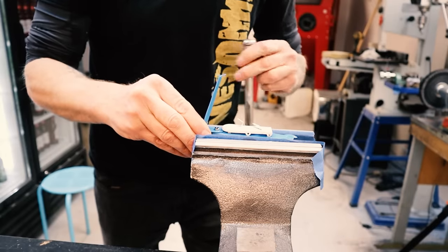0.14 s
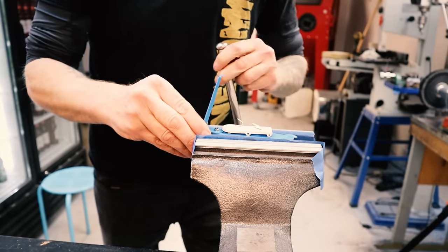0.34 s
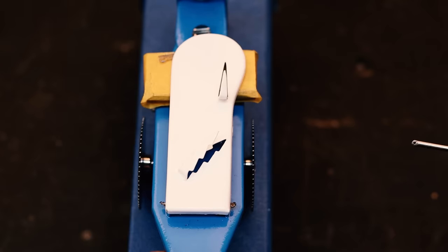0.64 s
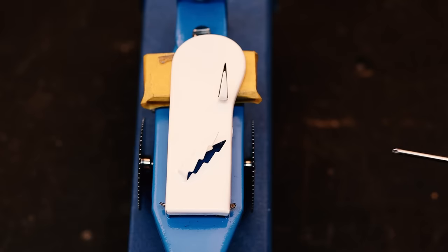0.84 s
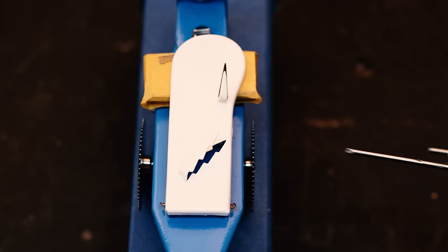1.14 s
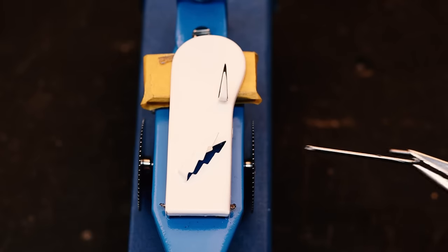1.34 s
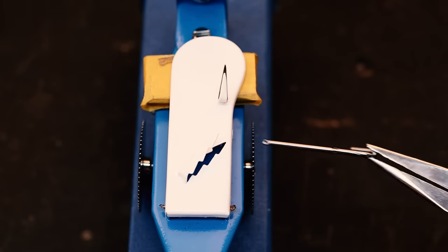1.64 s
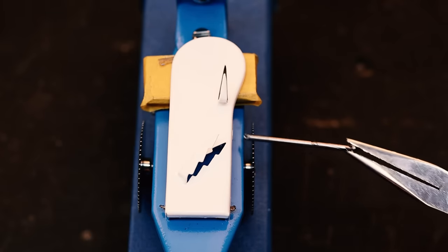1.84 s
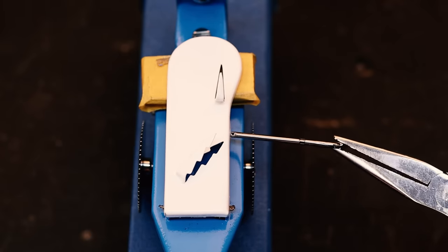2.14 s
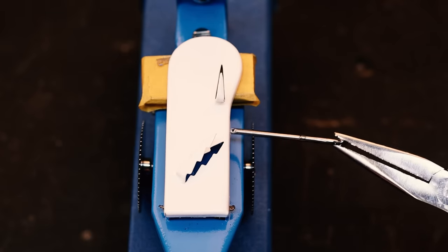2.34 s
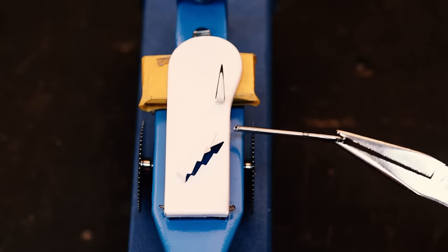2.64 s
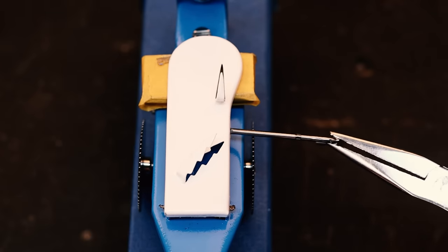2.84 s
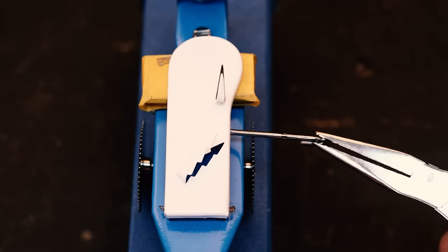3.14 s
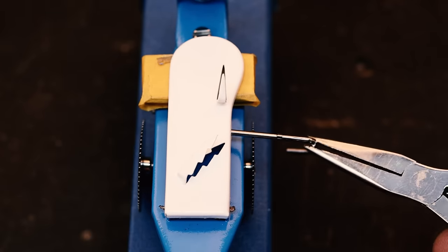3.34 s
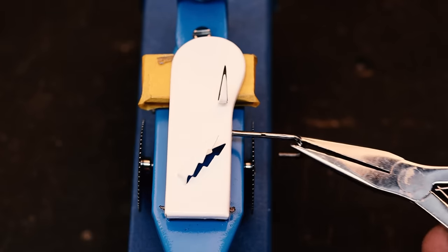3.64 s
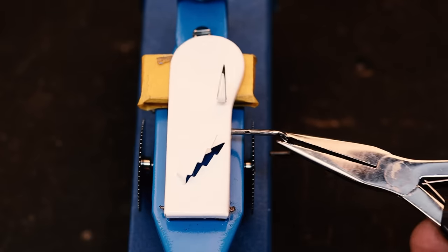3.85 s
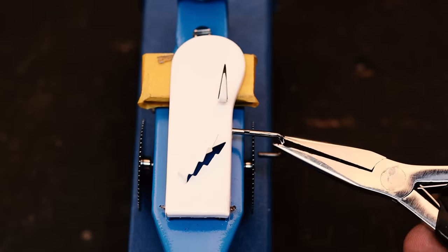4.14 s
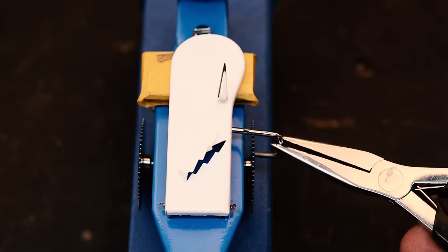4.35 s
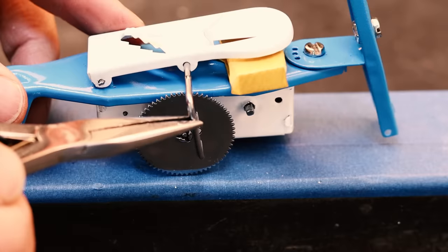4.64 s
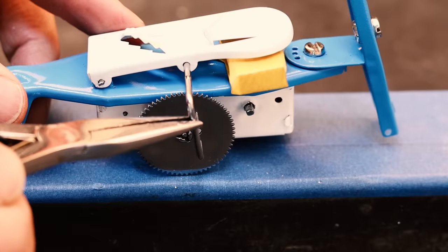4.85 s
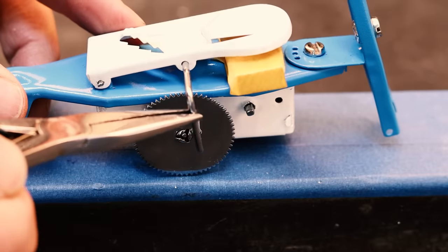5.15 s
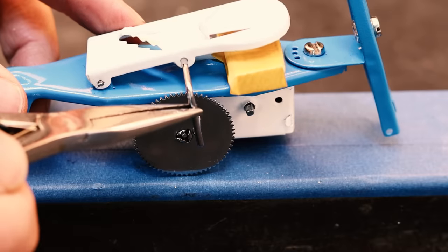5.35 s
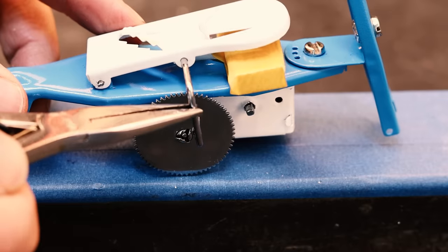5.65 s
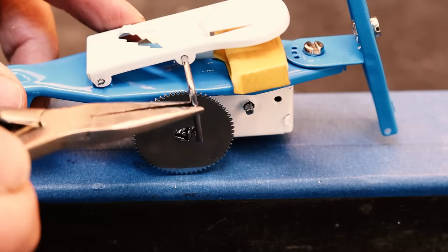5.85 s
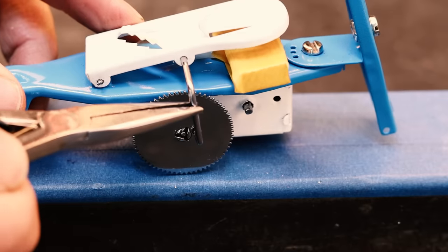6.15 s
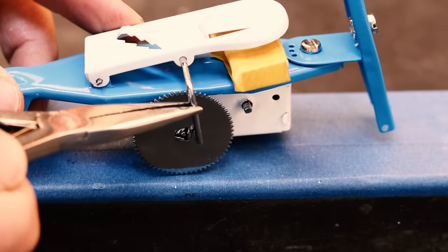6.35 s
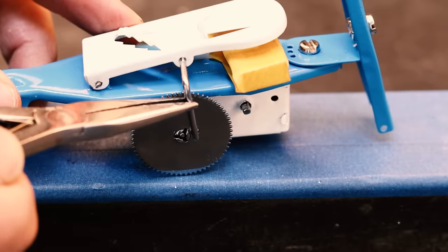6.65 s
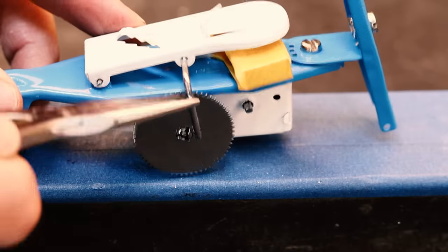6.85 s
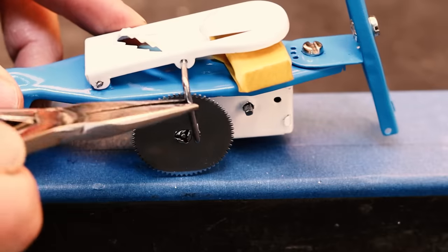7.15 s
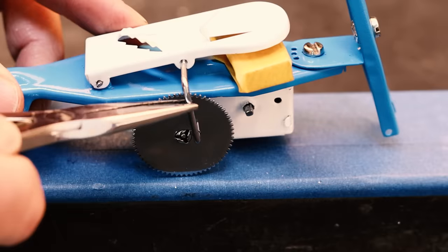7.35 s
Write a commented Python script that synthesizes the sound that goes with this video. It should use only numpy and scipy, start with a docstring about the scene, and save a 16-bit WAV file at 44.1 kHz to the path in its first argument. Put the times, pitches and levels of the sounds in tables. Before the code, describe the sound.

A close stereo pickup at a bench in a small, moderately reverberant workshop, with a quiet, dull ventilation rush throughout. From 0.05 to 0.3 s, knocks in a vice build quickly into heavy thuds and hard steel clacks, strongest around 0.22-0.27, with a brief metallic ring and room tail. Soft sliding follows until about 0.8. Then mostly air until sparse, tiny double ticks of wire on tin at 2.1-2.9 and a busier group at 3.3-3.55, the clearest near 3.5. Pliers clink very faintly at 4.0 and 4.3. Small gear clicks begin around 5.4, with a clearer one at 5.8. At 5.92 the gear snaps over in a sharp, tight triple strike, much louder than its neighbours. Lighter clicks cluster near 6.5 and 6.9, with dull frame bumps and short, grainy rasps around 6.9-7.0, fading to faint touches and ventilation.

```python
"""A steel part is knocked about in a bench vice; then pliers work a wire link into a tin wind-up toy.
Blows, ticks and gear clicks are sums of damped modes plus short bursts of coloured noise;
the gear once snaps over, the toy's frame bumps on its stand, and friction is grainy noise.
A close pair of microphones hears the bench, a small workshop and its steady ventilation."""
import sys
import numpy as np
from scipy import signal
from scipy.fft import rfft, irfft, next_fast_len
from scipy.io import wavfile
from scipy.ndimage import uniform_filter1d

SR = 44100
rng = np.random.default_rng(int(sys.argv[2]) if len(sys.argv) > 2 else 0)


def digitize_waveform(pressure):
    """Quantize a signal to 16-bit integers and store it at the path in sys.argv[1].

    Rows of a 2-D input are taken as channels; values are limited to [-1, 1].
    """
    field = np.atleast_2d(pressure).T
    bounded = np.clip(field, -1, 1)
    quanta = np.round(bounded * 32767).astype(np.int16)
    wavfile.write(sys.argv[1], SR, quanta)


N = 330750

# the gear slips over and rebounds: start_s, level_db, hardness_db_per_octave
SNAP_STRIKES = [(5.9219, -29.5, 6), (5.924, -20, -12), (5.9291, -29.5, -6.5)]
# the gear's teeth knock as it is rocked: start_s, level_db, hardness_db_per_octave
GEAR_KNOCKS = [(5.358, -56, -4), (5.371, -49.5, -2), (5.4391, -57, -14), (5.819, -39.5, -4.5),
               (5.841, -51.5, -2.5), (5.866, -51, 3), (5.881, -49, -5), (6.096, -58.5, -3),
               (6.4778, -56, -4.5), (6.505, -50, -15), (6.5329, -45.5, -2.5), (6.5386, -39.5, -1.5),
               (6.565, -45.5, -1.5), (6.88, -60.5, 5), (6.8901, -38, -6), (7.012, -58.5, -3.5),
               (7.1835, -62.5, -1.5)]
# the pliers' jaws clink shut on the wire: start_s, level_db, hardness_db_per_octave
JAW_GRIPS = [(4.0002, -59.5, 3), (4.3280, -55.5, 5.5)]
TIN_HZ, WIRE_HZ, CRACK_HZ, RIM_HZ = 2840, 6060, 4800, 10200  # where each part of a contact sounds
CLAMPED_WIRE_DB = -15  # squeezed hard, the wire hardly rings


def vice():
    """Impact excitation: blows clack in the jaws, shake the heavy bench and set the steel on it ringing."""
    # blows at the vice: start_s, bench_thud_db, steel_clack_db
    blows = [(0.048, -44, -73), (0.103, -35.5, -72), (0.193, -24, -47), (0.223, -25.5, -23),
             (0.2426, -20.5, -22), (0.2453, -18, -27.5), (0.2699, -22.5, -56)]
    # modes of the bench, the vice and the steel lying on the bench: pitch_hz, level_db, t60_s
    bench_modes = [(60.2, 1.5, 0.34), (109, -2.5, 0.3), (172.5, 3.5, 0.19), (254, -2, .2),
                   (309, -10, 0.072), (385, -4.5, 0.147), (510.5, -9, 0.15), (615, -14.5, 0.28),
                   (767, -22, .14)]
    vice_modes = [(640, -1.5, 0.089), (910, -1, 0.088), (1097, -2, 0.067), (1330, -7.5, .08),
                  (1741, 3.5, 0.065), (2300, -9, 0.064), (2450, -9, 0.094), (3470, 3.5, 0.031),
                  (3810, -9, 0.031), (4440, -6, .035)]
    steel_modes = [(476, -4, 0.47), (603, 0, 0.71), (872, -8, 0.59), (994, -8, 0.57), (1486, -10, 0.66),
                   (1760, 1, 0.22), (2239, -9, 0.55), (3365, -12, 0.42), (3420, -5, 0.45), (4387, -25, 0.5)]
    # noise spectra of the blow: pitch_hz, level_db_per_hz
    thud_spectrum = [(25, -7), (70, -3), (130, 5), (280, -2), (450, -17), (620, -8), (800, -14.5),
                     (1200, -21), (3000, -39), (8000, -110)]
    clack_spectrum = [(200, -12), (600, 4.5), (1200, -10), (1750, 1.5), (2800, -8.5), (3450, -7.5),
                      (4600, -13.5), (6000, -28), (11000, -35), (14000, -80)]
    scrape_spectrum = [(2000, -15), (5000, 10), (7600, 17), (8700, -6), (11000, 2.5), (12200, -27),
                       (14000, -45)]
    steel_db, scrape_db = -13.5, -27  # against the clack

    ringing, rattle = np.zeros(N), np.zeros(N)
    t = np.arange(SR // 2) / SR
    for s, thud_db, clack_db in blows:
        add(ringing, s, amp(thud_db) * ring(bench_modes, t))
        add(ringing, s, amp(clack_db - 4.5) * ring(vice_modes, t))
        add(ringing, s, amp(clack_db + steel_db) * ring(steel_modes, t))
        add(rattle, s, amp(thud_db - 7) * puff(thud_spectrum, t, t60=0.11, attack=0.0018))
        add(rattle, s, amp(clack_db - 7.0) * puff(clack_spectrum, t, t60=0.063, attack=0.0009))
        add(rattle, s, amp(clack_db + scrape_db) * puff(scrape_spectrum, t, t60=0.015, attack=0.0007))
    return ringing + rattle + room(amp(-10.5) * ringing + amp(0.5) * rattle)


def snap():
    """Sudden release: the gear jumps a tooth under load and strikes three times in quick succession."""
    out = np.zeros((2, N))
    for s, db, hardness in SNAP_STRIKES:
        strike = contact(
            struck(db, hardness, CLAMPED_WIRE_DB), left_late_s=0.00045, left_db=-2,
            ring_db=-3.5, side_db=-15.5, crack_db=-3, crack_t60=0.018,
            scatter_db=-0.5, scatter_t60=0.035, ring_room_db=-12.5, crack_room_db=-6.5)
        add(out, s, strike)
    return out


def gear():
    """Impact excitation: the rocked gear knocks its neighbour's teeth and rings the tin chassis."""
    held_wire_db = -9  # the gripped wire's ring, against the tin
    out = np.zeros((2, N))
    for s, db, hardness in GEAR_KNOCKS:
        click = contact(
            struck(db, hardness, held_wire_db), left_late_s=0, left_db=-3.5,
            ring_db=-2.5, side_db=-3.5, crack_db=-4.5, crack_t60=0.0074,
            scatter_db=4.0, scatter_t60=.05, ring_room_db=-11.5, crack_room_db=-3.5)
        add(out, s, click)
    return out


def ticks():
    """Elastic rebound: light touches, at the vice, of the wire on the tin and at each grip, sound twice."""
    # light touches of small metal parts, one tick at the vice, then the wire's tip on the tin:
    # start_s, level_db, hardness_db_per_octave, wire_ring_db
    touches = [(0.2699, -57.5, 0.5, -20), (2.1277, -53, -3.5, -8), (2.3447, -51.5, -6, -4),
               (2.4552, -61, -12, -8), (2.8879, -53, -3, -1), (2.9195, -58, 1.5, 5.5), (3.274, -58, -8, 3),
               (3.3335, -58, 0.5, 10), (3.3777, -61, -6, 17), (3.471, -60.5, -6.5, 9),
               (3.4854, -44, -10.5, -15), (3.5512, -55.5, -4, 7.5), (4.219, -65.5, -8, -3)]
    rebound_s, rebound_db = 0.0024, -7  # delay and level of the second touch, against the first

    out = np.zeros((2, N))
    clamped = [(*grip, CLAMPED_WIRE_DB) for grip in JAW_GRIPS]
    for s, db, hardness, wire_db in list(touches) + clamped:
        add(out, s, touch(db, hardness, wire_db))
        add(out, s + rebound_s, touch(db + rebound_db, hardness, wire_db))
    return out


def touch(db, hardness, wire_db):
    """Light impact: one touch of small metal parts, its crack widely scattered."""
    return contact(
        struck(db, hardness, wire_db), left_late_s=0, left_db=-3.0,
        ring_db=-1.0, side_db=-7.0, crack_db=-0.5, crack_t60=0.0088,
        scatter_db=6, scatter_t60=0.052, ring_room_db=-10.5, crack_room_db=-2.0)


def struck(db, hardness, wire_db):
    """Contact stiffness: the harder the contact, the brighter; higher parts gain hardness per octave."""
    crack_db = -6  # against the tin
    # parts in order: tin, wire, crack, rim
    octaves = np.log2(np.array([TIN_HZ, WIRE_HZ, CRACK_HZ, RIM_HZ]) / TIN_HZ)
    return db + hardness * octaves + np.array([0, wire_db, crack_db, 0])


def contact(levels, left_late_s, left_db, ring_db, side_db, crack_db, crack_t60,
            scatter_db, scatter_t60, ring_room_db, crack_room_db):
    """Modal impact: metals meet in a crack that scatters off the bench; tin, wire and gear ring on."""
    # modes of the tin chassis, the wire link and the gear's rim: pitch_hz, level_db, t60_s
    tin_modes = [(1827, -1.5, 0.028), (2260, -22, 0.016), (2500, 1, 0.024), (2576, -2.5, 0.077),
                 (2831, 9, 0.034), (3040, -9, 0.035), (3090, -20.5, 0.026), (3470, -19.5, 0.043)]
    wire_modes = [(4460, -20, .03), (5984, 3, 0.038), (6950, -11, 0.073)]
    rim_modes = [(8290, 0, 0.042), (8900, 3, .04), (9400, -8, 0.055), (10750, -2.5, .035),
                 (11230, -1, 0.065), (12850, -10.5, 0.026), (15100, -8.5, .01)]
    # contact noise: pitch_hz, level_db_per_hz
    crack_spectrum = [(500, -28), (1100, -6.5), (1800, 2), (2800, 3), (4300, 0), (7000, -2), (9500, -9.5),
                      (11400, -3), (12600, -16), (13600, -23), (16000, -36)]

    tin_db, wire_db, noise_db, rim_db = levels
    t = np.arange(SR // 5) / SR

    def modes():
        tin = amp(tin_db) * ring(tin_modes, t)
        wire = amp(wire_db) * ring(wire_modes, t, scatter_db=7)
        rim = amp(rim_db - 10.5) * ring(rim_modes, t)
        return amp(ring_db) * (tin + wire + rim)

    # the tin's crowded resonances also lift the noise of the contact
    lift_db = np.logaddexp(tin_db - 5.0, noise_db)
    colour = [(2050, min(noise_db, tin_db - 8)), (2500, lift_db), (3050, lift_db),
              (3700, noise_db), (6500, noise_db), (10000, rim_db)]

    def hiss(t60, attack):
        return filtered(puff(crack_spectrum, t, t60, attack), lambda hz: amp(along(colour, hz)))

    ringing = modes()
    crack = amp(crack_db) * hiss(crack_t60, attack=0.00025)
    # the thin sheet radiates differently to each side
    sides = amp(side_db) * modes() * [[1], [-1]]
    near = ports(ringing + crack, left_late_s, left_db) + sides
    scatter = np.array([hiss(scatter_t60, attack=0.0011) for _ in range(2)])
    direct = near + amp(scatter_db) * scatter
    to_walls = amp(ring_room_db) * ringing + amp(crack_room_db) * scatter[0]
    # silence added at the end leaves time for the room's tail
    return np.pad(direct, ((0, 0), (0, SR // 3))) + room(np.pad(to_walls, (0, SR // 3)))


def bumps():
    """Low modes softly excited: gear clicks and the hand jolt the frame on its stand in dull thuds."""
    # the hand nudges the toy on its stand: start_s, level_db
    nudges = [(5.774, -48), (5.878, -38), (6.096, -45), (7.017, -47), (7.135, -51)]
    # the frame settles ever more firmly: time_s, stand_gain_db
    seating = [(5.85, -10), (6.55, -1.5), (7.0, 1)]
    # modes of the stand and the frame: pitch_hz, level_db, t60_s
    stand_modes = [(105, -6, 0.12), (137.8, 5.5, 0.12), (171, -9.5, 0.065), (211, -9, 0.11)]
    frame_modes = [(233.5, -9.5, 0.13), (318.3, 3.5, 0.11), (416, -5.5, 0.053), (625, -16, 0.16)]
    # jolt from a gear click: delay, level at a 0 dB click, dB per dB of click
    jolt_s, jolt_db, jolt_grows = 0.00495, -25.5, 0.52

    out = np.zeros(N)
    t = np.arange(SR // 2) / SR
    causes = list(GEAR_KNOCKS) + list(SNAP_STRIKES[:1])
    jolts = [(s + jolt_s, jolt_db + jolt_grows * db) for s, db, _ in causes]
    soft_rise = 1 - np.exp(-t / 0.0018)
    for s, db in jolts + list(nudges):
        stand_db = db + np.interp(s, *np.transpose(seating))
        stand = amp(stand_db + 3.0) * ring(stand_modes, t)
        frame = amp(db - 4.0) * ring(frame_modes, t)
        add(out, s, (stand + frame) * soft_rise)
    return out + amp(-3.5) * room(out)


def pliers():
    """Low damping: the hard steel jaws ring longer than the tin does."""
    # modes of the jaws: pitch_hz, level_db, t60_s
    jaw_modes = [(2770, -11, .04), (3620, -2, 0.067), (4630, 1, 0.099), (6000, -8, 0.09), (7400, 1, 0.063),
                 (9100, -3, .11), (11270, -13, 0.092)]
    out = np.zeros(N)
    t = np.arange(SR // 5) / SR
    for s, db, hardness in JAW_GRIPS:
        jaw_db = db - 3 + hardness * np.log2(WIRE_HZ / TIN_HZ)
        add(out, s, amp(jaw_db) * ring(jaw_modes, t))
    return out + amp(-19) * room(out)


def friction():
    """Stick-slip friction: fingers and parts slide softly, the gear's teeth rasp under the pliers."""
    # strokes of sliding and of rasping: middle_s, length_s, level_db
    slides = [(0.09, 0.13, -61.5), (0.434, 0.34, -61.5), (0.806, 0.045, -64.5), (3.148, 0.15, -73),
              (3.217, .02, -65.5), (4.15, 0.023, -67), (5.192, 0.024, -63)]
    rasps = [(5.44, 0.018, -73), (5.80, 0.074, -68), (6.51, 0.1, -70), (6.60, 0.062, -71),
             (6.928, 0.031, -55.5), (6.965, 0.029, -64), (7.008, 0.022, -55)]
    # their noise spectra: pitch_hz, level_db_per_hz
    slide_colour = [(300, -18), (900, 4), (3000, 3), (6000, -10), (11000, -11), (13500, -40)]
    rasp_colour = [(1000, -13.5), (2400, -9.5), (2850, 2), (3200, 1.5), (3800, -19), (7000, -30),
                   (11500, -16), (14000, -47)]
    return rubbing(slides, slide_colour, grain_db=6.0) + rubbing(rasps, rasp_colour, grain_db=14.0)


def rubbing(strokes, colour, grain_db):
    """Stick-slip: noise swells and fades with each stroke, catching and slipping every few milliseconds."""
    t = np.arange(N) / SR
    swell = sum(amp(db) * np.exp(-(2 * (t - s) / length) ** 2) for s, length, db in strokes)
    wander = unit(uniform_filter1d(rng.standard_normal(N), size=120))
    catches = amp(grain_db * np.tanh(wander))
    rub = swell * unit(catches * noise(colour, N))
    return rub + amp(-5.0) * room(rub)


def ventilation():
    """Broadband flow noise in a diffuse field: a steady, dull rush fills the workshop."""
    # spectrum of the rush: pitch_hz, level_db_per_hz
    air_spectrum = [(12, -20.5), (30, -3), (48, 5), (60, -12.5), (79, 1.5), (100, -11.5), (220, -9.5),
                    (400, -12), (1000, -17), (2500, -24), (6000, -33), (12400, -44.5), (13300, -70),
                    (16000, -88)]
    # left-right correlation: pitch_hz, likeness (1 alike, -1 opposed)
    air_likeness = [(45, 1), (80, 0.99), (130, 0.62), (290, -0.36), (640, -0.53), (1400, -0.56),
                    (3100, -0.6), (7000, -0.66), (12000, -0.56)]
    air_db = -50.5  # rms against full scale
    pair = np.array([noise(air_spectrum, N), noise(air_spectrum, N)])
    return amp(air_db) * unit(diffuse(pair, air_likeness))


def room(x):
    """Reverberation: the workshop's tail, each frequency dying at its own speed."""
    # decay of the workshop: pitch_hz, t60_s
    room_decay = [(100, 0.48), (600, .62), (2800, 0.52), (6000, 0.43), (12000, 0.31)]
    # left-right correlation of the tail: pitch_hz, likeness (1 alike, -1 opposed)
    room_likeness = [(80, 1), (160, 0.99), (300, 0.9), (600, 0.16), (1400, -0.22), (12000, -0.82)]
    hz, t, z = signal.stft(rng.standard_normal((2, SR)), SR, nperseg=256)
    decay = amp(-60 * t / along(room_decay, hz)[:, None])
    build_up = 1 - np.exp(-t / 0.0021)
    pair = signal.istft(z * decay * build_up, SR, nperseg=256)[1]
    tail = diffuse(pair, room_likeness)
    return signal.fftconvolve(x[None], tail / np.linalg.norm(tail[0]), axes=1)[:, :len(x)]


def ring(modes, t, scatter_db=1.15):
    """Modal synthesis: damped modes build up within a cycle, at new strengths and signs each time."""
    hz, db, t60 = np.transpose(modes)[..., None]
    level = db + scatter_db * rng.standard_normal(hz.shape) - 60 * t / t60
    rise = 1 - np.exp(-(2 * hz * t) ** 2)
    sign = rng.choice([-1, 1], hz.shape)
    return burst(np.sum(sign * amp(level) * rise * np.sin(2 * np.pi * hz * t), 0))


def puff(spectrum, t, t60, attack):
    """High modal density: a blow's quickly dying noise; softer contact rises more slowly."""
    rise = 1 - np.exp(-(t / attack) ** 2)
    return burst(noise(spectrum, len(t)) * amp(-60 * t / t60) * rise)


def ports(x, left_late_s, left_db):
    """Spaced-pair cues: the two microphones hear a near sound a little apart in time and level."""
    delays = lambda hz: np.exp(np.outer([-1, 1], 1j * np.pi * hz * left_late_s))
    return filtered(x, delays) * amp([[left_db / 2], [-left_db / 2]])


def diffuse(pair, alike):
    """Diffuse-field correlation: two unrelated signals mix to a given left-right likeness per frequency."""
    turn = lambda hz: np.arccos(np.clip(along(alike, hz), -1, 1)) / 2
    mid, side = filtered(pair, lambda hz: np.array([np.cos(turn(hz)), np.sin(turn(hz))]))
    return np.array([mid + side, mid - side])


def noise(spectrum, size):
    """Spectral shaping: coloured noise of rms 1."""
    return unit(filtered(rng.standard_normal(size), lambda hz: amp(along(spectrum, hz))))


def filtered(x, response):
    """Linear filtering: the spectrum of x times a response of frequency."""
    n = x.shape[-1]
    m = next_fast_len(n + 8192)  # padding keeps the end from wrapping onto the start
    return irfft(rfft(x, m) * response(np.fft.rfftfreq(m, 1 / SR)), m)[..., :n]


def along(points, hz):
    """Logarithmic pitch scale: interpolates (pitch_hz, value) points."""
    f, v = np.transpose(points)
    return np.interp(np.log(hz + 1), np.log(f + 1), v)


def amp(db):
    """Level to amplitude: decibels become gain."""
    return 10 ** (np.asarray(db) / 20)


def unit(x):
    """Power normalisation: x at rms 1."""
    return x / np.sqrt(np.mean(x ** 2) + 1e-20)


def burst(x):
    """Energy normalisation: x with the energy of a hundredth of a second at rms 1."""
    return x / np.sqrt(np.sum(x ** 2) / np.prod(x.shape[:-1]) * 100 / SR)


def add(track, s, sound):
    """Superposition: mixes a sound into the track at time s."""
    part = track[..., max(round(s * SR), 0):][..., :sound.shape[-1]]
    part += sound[..., :part.shape[-1]]


def scene():
    """Superposition: all sources at the bench and the air around it."""
    toy = snap() + gear() + ticks() + bumps()
    return vice() + toy + pliers() + friction() + ventilation()


def record(dry):
    """Band limiting: a steep low-pass leaves almost nothing above its limit."""
    top_hz = 15900
    return filtered(dry, lambda hz: 1 / np.sqrt(1 + (hz / top_hz) ** 120))


dry = scene()
out = record(dry)
digitize_waveform(out)
```